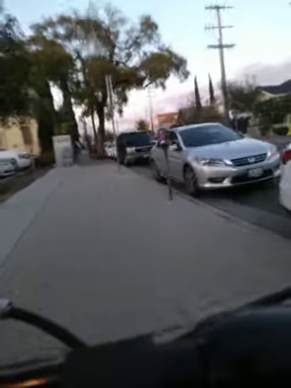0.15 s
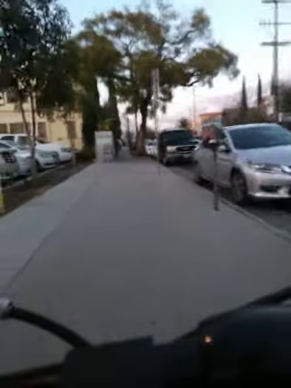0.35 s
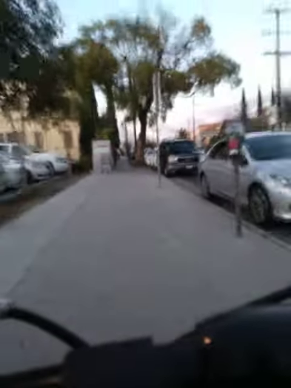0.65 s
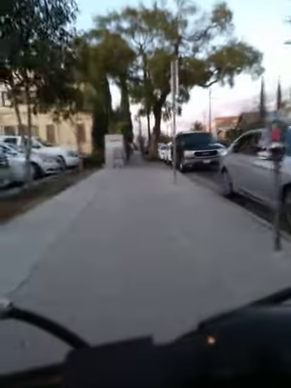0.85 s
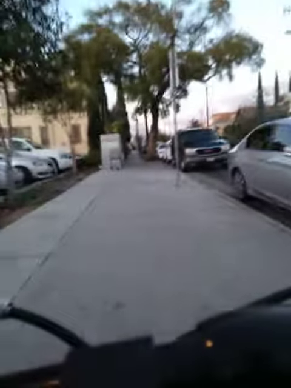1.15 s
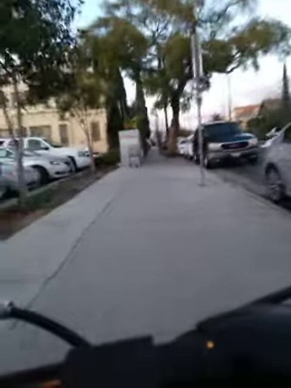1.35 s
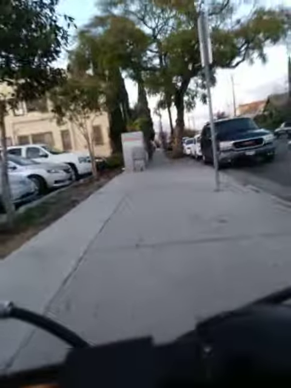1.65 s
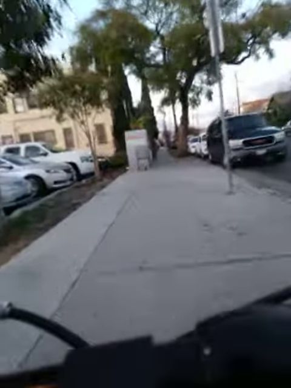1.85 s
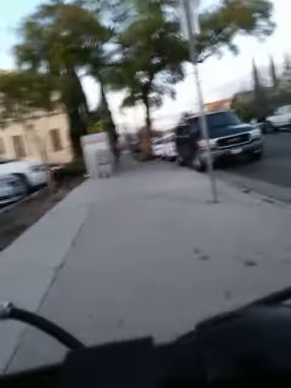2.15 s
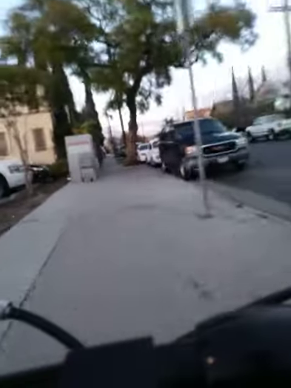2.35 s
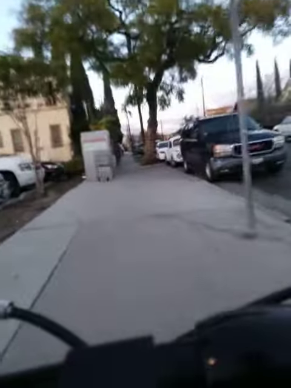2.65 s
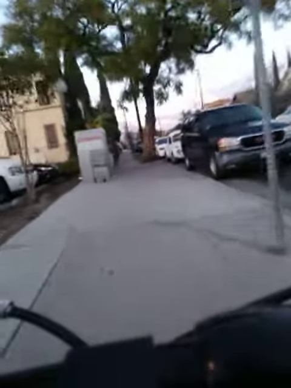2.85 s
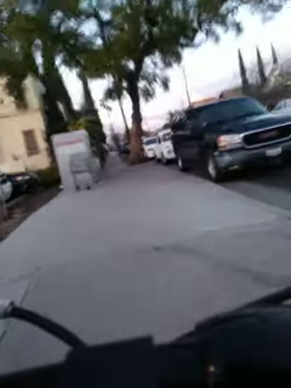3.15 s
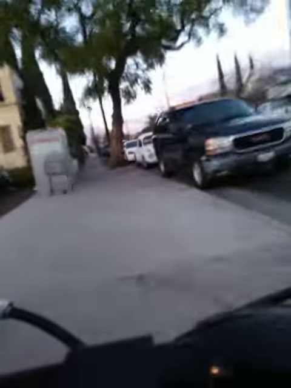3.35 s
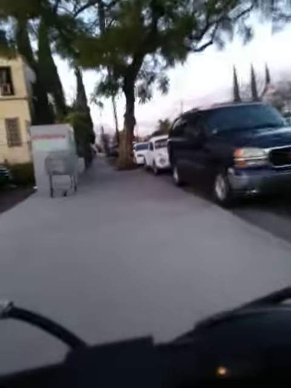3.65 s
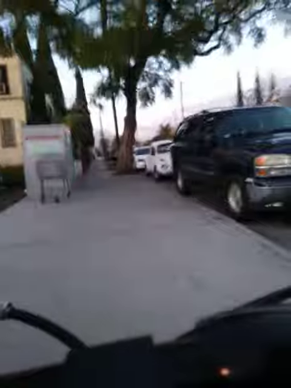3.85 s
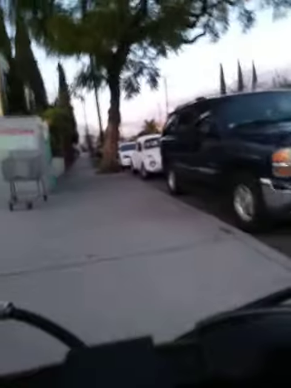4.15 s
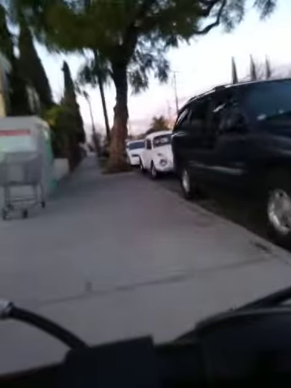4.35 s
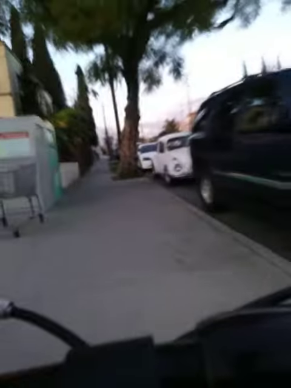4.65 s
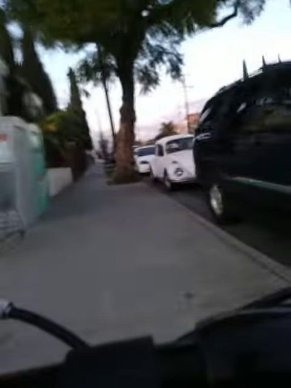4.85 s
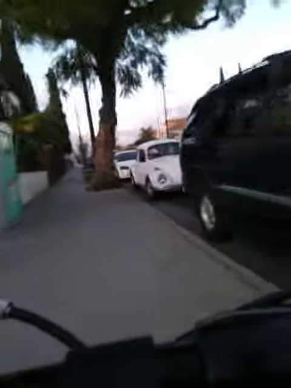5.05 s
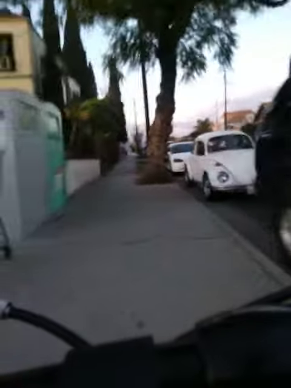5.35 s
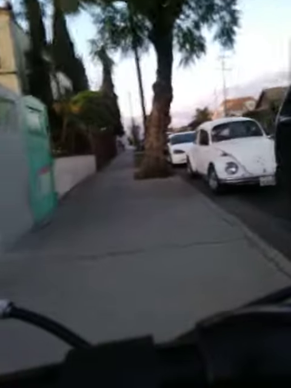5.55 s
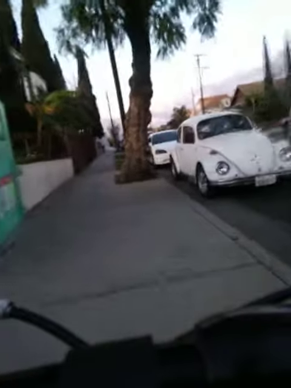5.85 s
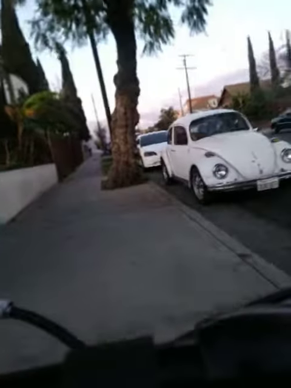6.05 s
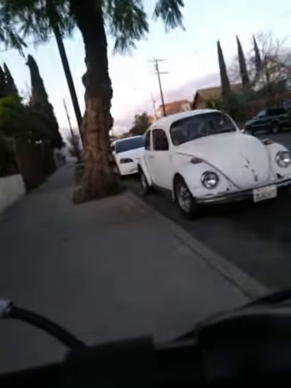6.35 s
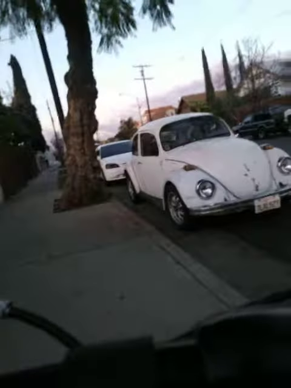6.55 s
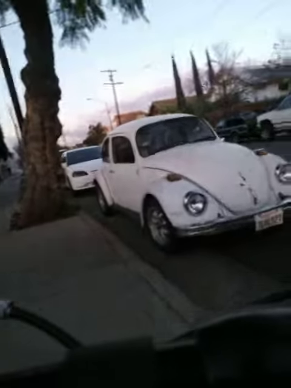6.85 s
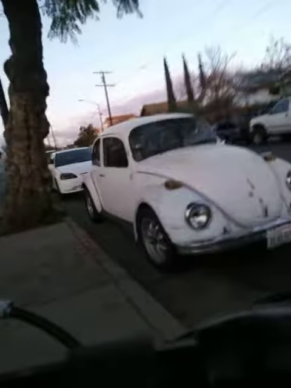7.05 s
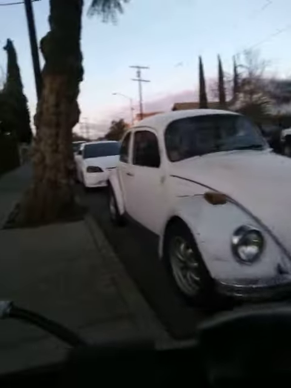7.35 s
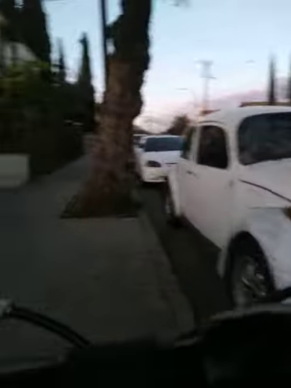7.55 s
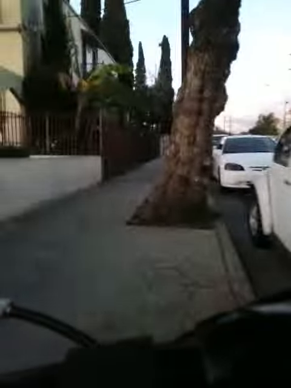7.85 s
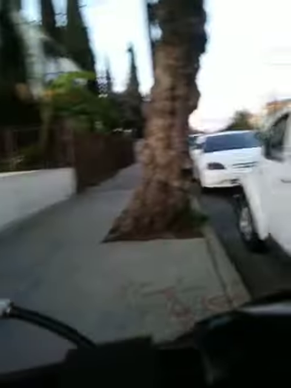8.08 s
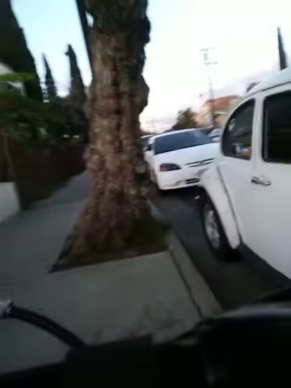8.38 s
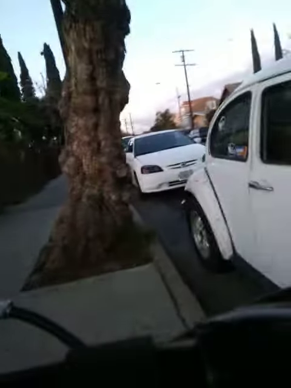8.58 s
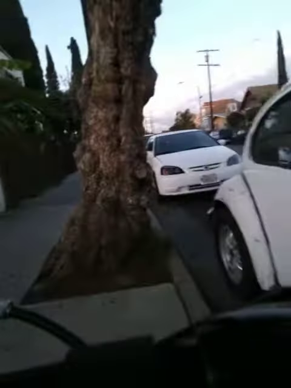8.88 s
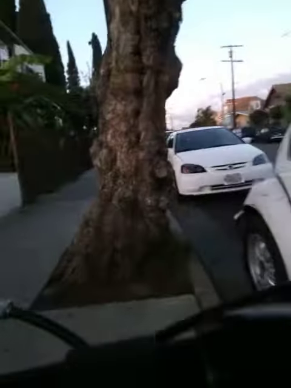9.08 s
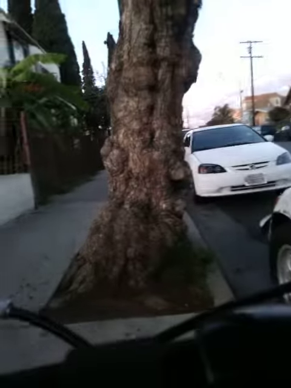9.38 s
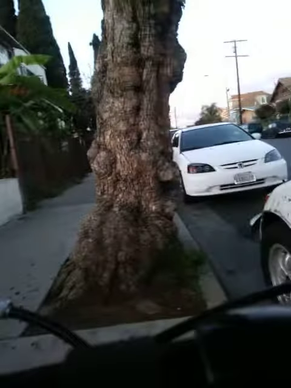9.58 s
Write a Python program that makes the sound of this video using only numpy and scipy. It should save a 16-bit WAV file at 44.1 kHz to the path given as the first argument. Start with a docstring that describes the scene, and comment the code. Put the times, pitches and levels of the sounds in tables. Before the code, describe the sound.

Loose metal parts knock and chatter hard as a bicycle rolls along pavement, gusts thumping the microphone, then it slows to faint ticks and stops.

```python
"""Loose metal knocks and chatters as a small-engined bicycle rolls on concrete, slows and stops.
Every blow sets decaying sines ringing: the metal parts shaken by the engine, tubes and housing.
Shaped noise makes the rough grit in the knocks, gusts thumping on the microphone port,
the bright scuff of a brake or shoe near the end, the faint ticking wheels and the street's hum."""
import sys
import numpy as np
from scipy import signal
from scipy.fft import rfft, irfft
from scipy.io import wavfile
from scipy.ndimage import uniform_filter1d, minimum_filter1d

SR = 44100
rng = np.random.default_rng(int(sys.argv[2]) if len(sys.argv) > 2 else 0)


def dump_mix(stems):
    """Bounce the given channels to the path in sys.argv[1] as a 16-bit WAV at rate SR."""
    frames = np.atleast_2d(stems).T  # one column per channel
    limited = np.clip(frames, -1, 1)  # hard clip at full scale
    pcm = np.round(limited * 32767).astype(np.int16)
    wavfile.write(sys.argv[1], SR, pcm)


N = 428652

# how unevenly the sound buzzes: frame, bracket, small parts, chain, highest modes [spread/dB]
BUZZ_DB = [.8, .8, 1.2, 2.5, 3.5]


def from_db(db):
    """Turn decibels into gain."""
    return 10 ** (np.asarray(db) / 20)


def rms_one(x):
    """Scale to an rms (average strength) of 1."""
    return x / np.sqrt(np.mean(x ** 2) + 1e-20)


def in_time(rows):
    """Join the points of a curve by straight lines, one value per sample for each column."""
    s, *columns = np.transpose(rows)
    return [np.interp(np.arange(N) / SR, s, column) for column in columns]


def coloured(points):
    """Noise of rms 1, its spectrum shaped by points of (f/Hz, level/dB)."""
    hz, level_db = np.transpose(points)
    grid_hz = np.maximum(np.arange(N // 2 + 1) * SR / N, 1)
    gain = from_db(np.interp(np.log(grid_hz), np.log(hz), level_db))
    return rms_one(irfft(rfft(rng.standard_normal(N)) * gain, N))


def band(low_hz, high_hz, order=2):
    """Noise of rms 1 between two frequencies; a slow band serves as a random wobble."""
    sos = signal.butter(order, [low_hz, high_hz], "band", fs=SR, output="sos")
    return rms_one(signal.sosfilt(sos, rng.standard_normal(N)))


def ring(blows, hz, t60, contact_s):
    """Each blow, softened by its contact time, starts a sine in any phase that falls 60 dB in t60 s."""
    soft = np.exp(-1 / (contact_s * SR))
    contact = [(1 - soft) ** 2, 0, 0, 1, -2 * soft, soft ** 2]
    decay = [1, 0, 0, 1, -from_db(-60 / (t60 * SR)), 0]
    struck = np.flatnonzero(blows)
    force = np.full((2, len(blows)), 1e-18)
    phase = 2 * np.pi * rng.random(len(struck))
    force[:, struck] = blows[struck] * [np.cos(phase), np.sin(phase)]
    along, across = signal.sosfilt([contact, decay], force)
    # the decaying envelopes ride on a sine, whose pitch may change with time
    turn = 2 * np.pi * np.cumsum(np.broadcast_to(hz, len(blows))) / SR
    return along * np.cos(turn) + across * np.sin(turn)


def street():
    """The faint hum of the street: steady coloured noise whose level wavers a little."""
    # spectrum of the street [f/Hz, level/dB]
    street_colour = [(18, -36.5), (40, -1), (81, 7.5), (165, -5), (554, -4.5), (730, -7.5), (1350, -8),
                     (1700, -15), (4420, -19.5), (6550, -28.5), (16000, -50)]
    # its loudness over time [t/s, level/dB]
    street_level = [(0.0, -45), (5.2, -46.5), (9.2, -57), (9.5, -66.5)]
    level_db, = in_time(street_level)
    return from_db(level_db + 1.2 * band(1.0, 12)) * coloured(street_colour)


def rolling():
    """Wheels tick nearly regularly and ever slower: short puffs of bright noise over steady tyre hiss."""
    # loudness of ticks and hiss together [t/s, level/dB]
    rolling_level = [(0, -48), (5.6, -51.5), (7.75, -55.5), (9.2, -64), (9.42, -75)]
    # their spectrum [f/Hz, level/dB]
    rolling_colour = [(1500, -30), (2450, -4), (3000, -12), (4100, -13), (4450, 3), (4800, -9), (5900, -10),
                      (9000, -41)]
    start_per_s, slows_per_s2, puff_t60_s = 39, 1.7, .04
    hiss = .9   # against ticks of rms 1
    level_db, = in_time(rolling_level)
    per_s = (start_per_s - slows_per_s2 * np.arange(N) / SR) * (1 + .2 * band(5, 20))
    # a tick falls whenever the running count passes a whole number
    ticks = np.diff(np.floor(np.cumsum(per_s) / SR), prepend=0)
    ticks = ticks * from_db(rng.normal(0, 2.5, N))
    puffs = rms_one(np.abs(ring(ticks, 0, puff_t60_s, 0.00097)))   # at 0 Hz only the envelope is left
    return from_db(level_db) * (hiss + puffs) * coloured(rolling_colour)


def wind():
    """Gusts thump on the microphone port: lumpy low turbulence; strong gusts reach higher."""
    # gusts [middle t/s, half length/s, level/dB]
    gusts = [(0.409, 0.031, -29.5), (1.303, 0.03, -21), (3.195, 0.014, -17.5), (3.294, 0.034, -11.5),
             (3.432, 0.061, -26.5), (3.594, 0.04, -26), (3.792, 0.075, -27), (4.942, 0.03, -33.5),
             (5.296, 0.027, -21.5), (5.44, 0.073, -27), (5.926, 0.021, -24.5), (5.991, 0.037, -31.5),
             (7.989, 0.057, -38), (9.235, 0.029, -29), (9.341, 0.1, -46)]
    fall_db = 3.5   # at one half length from the middle
    upper_db, upper_per_db = 3, 0.6   # upper band in a 0 dB gust, and its loss per dB of a weaker gust
    low = band(57, 123.8, order=3)
    high = band(160, 228.0, order=3)
    now = np.arange(N) / SR
    out = np.zeros(N)
    for middle, half, level_db in gusts:
        gust_db = level_db - fall_db * ((now - middle) / half) ** 2
        upper = from_db(upper_db + upper_per_db * gust_db)
        out += from_db(gust_db) * (low + upper * high)
    return out


def tap():
    """Two soft touches ring the modes of the housing dully; the second wakes the middle modes more."""
    # touches [t/s, level/dB, middle modes against the rest/dB]
    touches = [(9.628, -31, -19.5), (9.643, -29.5, 0)]
    # modes of the housing [f/Hz, level/dB]
    housing = [(340, -1), (420, -6.5), (950, -11), (1700, -14), (2100, -17), (2550, -20), (4500, -20),
               (5400, -21), (6150, -19.5)]
    s, level_db, middle_db = np.transpose(touches)
    out = np.zeros(N)
    for hz, mode_db in housing:
        is_middle = 600 < hz < 6000
        blows = np.zeros(N)
        blows[(s * SR).astype(int)] = from_db(mode_db + level_db + middle_db * is_middle)
        out += ring(blows, hz, 0.086, 0.0011)
    return out * from_db(BUZZ_DB[3] * band(40, 250))


def scuff():
    """A brake or shoe rubs briefly: bright grainy noise swells while pressed, then lifts and fades."""
    # spectrum of the rub [f/Hz, level/dB]
    scuff_colour = [(1000, -18), (2600, -32), (3400, -18), (4300, -23), (4940, 6.5), (9870, -23.5),
                    (15300, -25), (16500, -49)]
    start_s, attack_s, hold_s = 9.215, 0.014, 0.058
    base_db, swell_db, lift_db, fade_db_per_s = -34, 4.5, -10.5, 229
    since = np.arange(N) / SR - start_s
    swell = from_db(swell_db * np.clip(since / hold_s, 0, 1))
    pressed = np.clip(since / attack_s, 0, 1) * swell
    after = np.maximum(since - attack_s - hold_s, 0)
    lifted_db = lift_db * np.minimum(after / attack_s, 1) - fade_db_per_s * after
    grain_db = 3.1 * band(33, 77)
    return pressed * from_db(base_db + lifted_db + grain_db) * coloured(scuff_colour)


def clinks():
    """Short knocks ring the bracket, a small part or a hollow tube alone, each at its own pitch."""
    # all levels hold before the final doubling
    # short knocks, weak to strong, ringing the bracket alone [t/s, level/dB]
    bracket_knocks = [(0.516, -12.5), (0.902, -6.5), (0.95, -10), (1.021, -11.5), (1.146, -14), (1.256, -7),
                      (1.324, -10.5), (1.636, -12.5), (2.084, -11), (2.108, -9), (2.145, -18.5),
                      (2.179, -15.5), (2.192, -17), (2.258, -21.5), (2.577, -17), (2.62, -16), (2.636, -13),
                      (2.672, -14.5), (2.693, -12), (2.771, -10), (2.918, -12.5), (2.959, -14.5),
                      (3.249, -14.5), (3.704, -16), (3.739, -12), (4.906, -14), (5.111, -17), (5.27, -15.5),
                      (5.287, -3), (5.629, -19.5), (5.833, -16), (6.632, -29.5), (6.721, -32), (6.958, -21),
                      (7.457, -29.5)]
    # one small part at a time [t/s, level/dB, f/Hz]
    small_clinks = [(1.459, -21, 2445), (1.483, -18.5, 2430), (1.53, -25, 3790), (1.553, -23.5, 4420),
                    (3.056, -23, 2402), (4.115, -13.5, 3662), (5.387, -23, 3902), (5.444, -21, 3700),
                    (6.633, -32, 5098), (6.655, -30, 4420), (7.311, -35.5, 6140), (7.825, -33, 5810),
                    (7.886, -30, 3510), (8.638, -40, 4540)]
    # hollow knocks from the tubes [t/s, level/dB, f/Hz]
    hollow_knocks = [(1.052, -29.5, 947), (1.652, -21, 897), (5.226, -34, 828), (5.28, -32.5, 726),
                     (5.584, -32.5, 573)]
    bracket_t60_s, clink_t60_s, hollow_t60_s = 0.033, 0.075, 0.079
    bracket_hz = 3124   # each knock lands about 1 % off
    strikes = [(s, db, bracket_hz * rng.normal(1, .01), bracket_t60_s) for s, db in bracket_knocks]
    strikes += [(*row, clink_t60_s) for row in small_clinks]
    strikes += [(*row, hollow_t60_s) for row in hollow_knocks]
    blow = (np.arange(SR // 10) == 0) * 1.0
    out = np.zeros(N)
    for s, level_db, hz, t60 in strikes:
        out[int(s * SR):][:len(blow)] += from_db(level_db) * ring(blow, hz, t60, 0.00039) * 2
    return out


def blows_by_part():
    """List the time/s and strength/dB of every blow on bracket, frame, small parts and chain."""
    # knocks of the loose parts
    # [t/s, bracket level/dB, frame against bracket/dB, small parts against bracket/dB]
    knocks = [(0.043, -11.5, 10, -2), (0.2, -6.5, -1.5, 0.5), (0.259, -7, 2, -11.5), (0.351, -2, 6, 1.5),
              (0.409, -12.5, -5, -12.5), (0.501, -10.5, 6, 4.5), (0.637, -0.5, -4, -10),
              (0.655, 14.5, -6.5, -3.5), (0.809, -18.5, 12.5, -0.5), (0.826, 3.5, -15, -7.5),
              (0.873, -2, -1, -4.5), (0.967, -6.5, 6.5, 7.5), (1.047, 6.5, -1, -8.5),
              (1.179, -3.5, 2.5, 0.5), (1.198, -11, 1.5, 0.5), (1.268, 1.5, 0, -8), (1.499, 1, -9.5, -8.5),
              (1.654, -3, -21, -2.5), (1.939, -10.5, -20, -3.5), (2.103, -8.5, -1, -14.5),
              (2.336, 0, -8, -11), (2.393, -7.5, 3, -34), (2.411, -10, 6, 0), (2.489, -1, 3.5, -1.5),
              (2.548, 12.5, -12, -4.5), (2.84, -8.5, 1, -6.5), (2.933, -7.5, 9.5, 4.5),
              (3.008, -0.5, -7, -4), (3.083, -11.5, 5.5, -0.5), (3.142, -2.5, -8.5, -12),
              (3.159, -5, -5, -3), (3.233, -2.5, -14, -4), (3.457, -6.5, -7.5, -11), (3.604, 0, -9, 0),
              (3.68, 10.5, -4, -6.5), (3.831, -11, 5.5, 4.5), (3.907, -2.5, 0, 5.5),
              (3.983, -1.5, -31, -6.5), (4.134, 5, -3, -7), (4.189, -5.5, -10.5, -6), (4.209, 2, -9.5, -4),
              (4.285, -1, -16.5, -0.5), (4.339, -13, -9.5, -0.5), (4.36, -5, -9, -1),
              (4.434, -0.5, -14, -2), (4.51, -5, 1, 4.5), (4.583, -3, 5.5, -7), (4.73, -7.5, -8.5, -4),
              (4.877, -5.5, 0.5, -6), (4.968, -5.5, -5.5, -4), (5.034, 2.5, -10.5, -0.5),
              (5.121, -9, -11, -2.5), (5.191, 4, -9.5, -3.5), (5.357, -6, -37, -13),
              (5.457, -4.5, -8.5, -8.5), (5.534, -5.5, 0, -13), (5.911, -3.5, -10, -9.5),
              (6.101, 1, -12.5, 4), (6.298, -12, -11.5, -13.5), (6.712, -29, -8, 13),
              (7.469, -15.5, -20, 0), (7.714, -18.5, -24, -3.5), (7.858, -24, -21, 0),
              (8.131, -20, -38, -3.5), (8.656, -28.5, -31, 6.5), (8.832, -27, -36, 1.5)]
    # extra chain jingles, some along with a knock [t/s, level/dB]
    jingles = [(0.7887, -27), (1.46, -25), (1.6532, -31.5), (3.244, -20), (3.429, -28), (3.8687, -43),
               (6.7087, -36), (7.4704, -25.5), (7.5182, -29.5), (7.6833, -30.5), (7.8543, -22.5),
               (8.1299, -32.5), (8.6203, -35)]
    chain_with_knock_db = -29.5   # against the small parts
    s, bracket_db, frame_db, small_db = np.transpose(knocks)
    jingle_s, jingle_db = np.transpose(jingles)
    frame_db = bracket_db + frame_db
    small_db = bracket_db + small_db
    spared = np.full(len(jingles), -120)   # a jingle adds next to nothing to the other parts
    knocks_db = [np.r_[db, spared] for db in (bracket_db, frame_db, small_db)]
    chain_db = np.r_[small_db + chain_with_knock_db, jingle_db]
    return np.r_[s, jingle_s], *knocks_db, chain_db


def grit():
    """Knocks bring rough noise bursts; the loudest overload briefly, heard as short broad cracks."""
    # burst against the blow, for bracket, frame, small parts, chain [level/dB]
    burst_levels = [-25, -23, -22.5, -22.5]
    lows_hz, highs_hz = [2700, 1100, 3900, 7000], [3900, 1900, 6500, 10000]
    crack_db, crack_steepness = -23, 6.0   # knocks of 0 dB or more; dB lost per dB below that
    s, *parts_db = blows_by_part()
    out = np.zeros(N)
    for level_db, grit_db, low_hz, high_hz in zip(parts_db, burst_levels, lows_hz, highs_hz):
        blows = np.zeros(N)
        blows[(s * SR).astype(int)] = from_db(level_db + grit_db)
        envelope = np.abs(ring(blows, 0, 0.13, 0.00046))
        roughness = from_db(4.8 * band(33, 360))
        out += envelope * roughness * band(low_hz, high_hz, order=3)
    for at, blow_db in zip(s, parts_db[0]):
        crack = rms_one(signal.lfilter([1], [1, -.85], rng.standard_normal(60))) * np.hanning(60)
        out[int(at * SR):][:60] += from_db(crack_db + crack_steepness * min(blow_db, 0)) * crack
    return out


def rattle():
    """Knocks, their rebounds and light chatter between them all ring the modes of the same metal."""
    # what the parts ring with [f/Hz, level/dB]
    metal = [(1050, -12), (1380, -4.5), (1520, 6), (1700, 0.5), (2440, -18), (3040, 2.5), (3130, 0),
             (3300, -7), (3650, -9.5), (4050, 6), (4430, -8), (4890, 8.5), (5070, -0.5), (5400, 5.5),
             (5850, 4.5), (7200, 20), (7920, 13.5), (8400, -2), (9200, -1.5), (10300, -10), (11700, -9),
             (12300, -7), (13200, -12.5), (14900, -9), (15650, 2.5)]
    # borders between frame, bracket, small parts, chain, highest modes [f/Hz]
    part_edges = [2100, 3900, 7000, 11000]
    # ring time of those five groups [t60/s]
    part_t60 = [0.023, 0.03, 0.031, 0.039, 0.05]
    # light chatter, before each group's own offset [t/s, level/dB]
    chatter = [(0, -25), (1.1, -22.5), (1.9, -28.5), (2.6, -20.5), (3.4, -26.5), (4.3, -25.5), (5.2, -23.5),
               (5.75, -42.5), (6.5, -51), (9.45, -80)]
    rebound_first_db, rebound_loss_db = -13.5, 3   # first rebound against the knock, loss for each further one
    shortest_gap_s, extra_gap_s = 0.0066, 0.0089   # the extra is a random average
    upper_loss_share = 0.76   # share of the rebound loss that chain and highest modes suffer
    fizz_against_chatter_db, treble_flicker_db = -30, 5
    light_blow_db, full_blow_db = -22.5, -15   # light blows favour no mode, full blows the strong ones
    s, bracket_db, frame_db, small_db, chain_db = blows_by_part()

    # each blow is followed by four rebounds
    gaps = np.cumsum(shortest_gap_s + rng.exponential(extra_gap_s, (len(s), 4)), axis=1)
    at = (np.column_stack([s, s[:, None] + gaps]) * SR).astype(int)
    rebounds = np.arange(5) > 0
    rebound_db = rebound_first_db - rebound_loss_db * np.arange(-1, 4) + rng.normal(0, 3, at.shape)
    rebound_db = rebound_db * rebounds
    latest = np.searchsorted(np.sort(at[:, 0]), np.arange(N), "right")   # blows so far

    # chatter ticks come in clusters
    chatter_db, = in_time(chatter)
    ticks_per_s = 250 * from_db(5 * band(3, 15))
    every_tick = np.flatnonzero(rng.random(N) < ticks_per_s / SR)
    # faint treble fizz of uneven strength around the knocks
    fizz_db = chatter_db[at[:, 0]] + fizz_against_chatter_db + rng.normal(0, 5.6, len(s))

    # every blow lands elsewhere and shares its energy differently among the modes of a part
    favour = np.interp(bracket_db, [light_blow_db, full_blow_db], [0, 1])[:, None]
    mode_hz, mode_db = np.transpose(metal)
    parts = np.searchsorted(part_edges, mode_hz)
    uneven_db = (12 - 4 * favour) * rng.standard_normal((len(s), len(metal)))
    share = from_db(favour * mode_db + uneven_db)
    share = share / np.sqrt(share ** 2 @ (parts[:, None] == parts))

    out = np.zeros((len(BUZZ_DB), N))
    for k, (hz, level_db) in enumerate(metal):
        part = parts[k]
        strength_db = [frame_db, bracket_db, small_db, chain_db, fizz_db][part]
        loss_share = upper_loss_share if part > 2 else 1
        scatter_db = rng.normal(0, 4, at.shape) * rebounds
        blow_db = strength_db[:, None] + rebound_db * loss_share + scatter_db
        shift = (rng.normal(-.001, .001, at.shape) * SR).astype(int)   # modes start slightly apart
        blows = np.zeros(N)
        blows[at + shift] = share[:, k, None] * from_db(blow_db)
        # a light tick wakes only some of the modes
        ticks = every_tick[rng.random(len(every_tick)) < .3]
        tick_db = chatter_db[ticks] + 3 * np.minimum(rng.exponential(1, len(ticks)), 4)
        part_db = [-17.5, -9.5, -21.5, -46.0, -38.0][part]
        blows[ticks] += from_db(level_db + tick_db + part_db + rng.normal(0, 5.5, len(ticks)))
        # loose parts settle differently after each knock, which shifts their pitch a little
        pitch_spread = [.06, .012, .03, .02, .01][part]
        settled_hz = (hz * (1 + rng.normal(0, pitch_spread, len(s) + 1)))[latest]
        contact_s = [.0012, .0012, .0016, .002, .002][part]
        out[part] += ring(blows, settled_hz, part_t60[part], contact_s)
    out[-1] *= from_db(treble_flicker_db * band(2, 9))   # the top treble flickers
    return sum(sound * from_db(buzz_db * band(40, 250)) for sound, buzz_db in zip(out, BUZZ_DB))


def scene():
    """Add up all sources at one microphone."""
    background = street() + rolling() + wind()
    details = tap() + scuff() + clinks()
    return (background + details + grit() + rattle())[None]


def record(dry):
    """A fast limiter turns the peaks down, then a steep filter cuts the top of the treble."""
    cutoff_hz = 16900   # from here up at least 70 dB down
    allowed = .9 / np.maximum(np.abs(dry), .9)
    gain = uniform_filter1d(minimum_filter1d(allowed, size=161), size=81)
    return signal.sosfilt(signal.cheby2(12, 70, cutoff_hz, fs=SR, output="sos"), gain * dry)


dry = scene()
out = record(dry)
dump_mix(out)
```